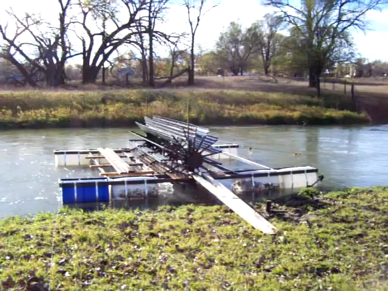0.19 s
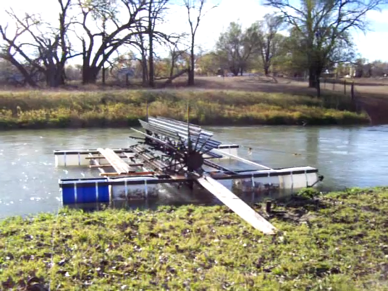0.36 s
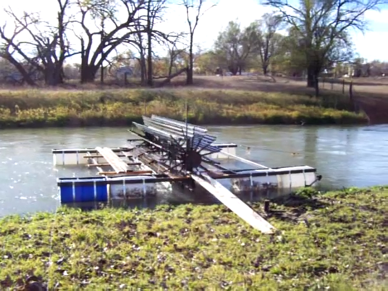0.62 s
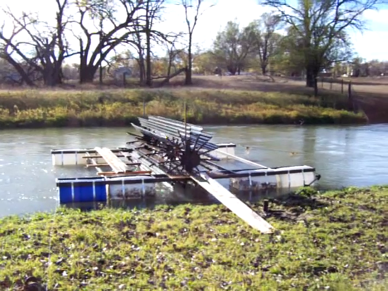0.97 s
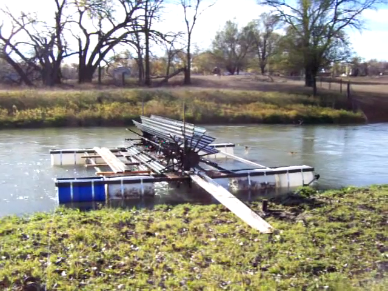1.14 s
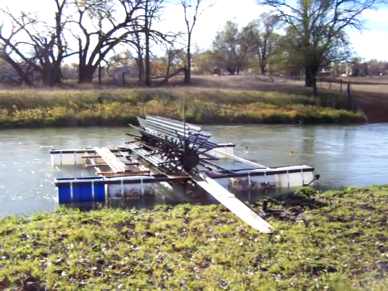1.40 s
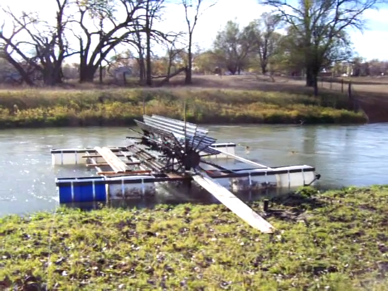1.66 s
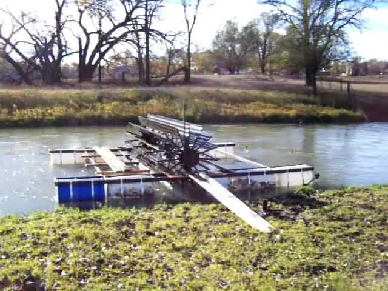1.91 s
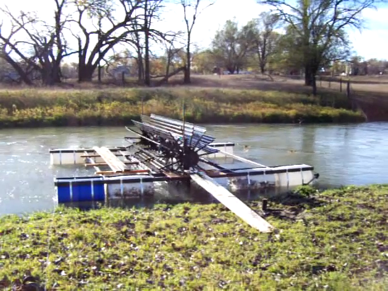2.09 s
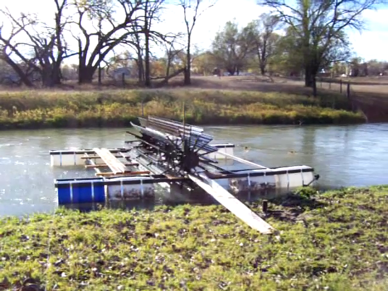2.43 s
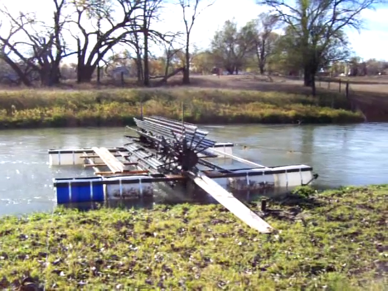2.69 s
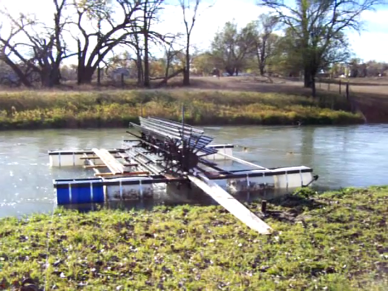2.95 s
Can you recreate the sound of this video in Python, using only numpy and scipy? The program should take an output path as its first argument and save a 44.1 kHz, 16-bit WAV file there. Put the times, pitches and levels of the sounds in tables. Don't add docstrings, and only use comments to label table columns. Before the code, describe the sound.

River water gurgles, drips and surges around a floating paddle wheel while wind softly buffets the microphone

```python
import sys
import numpy as np
from scipy import signal
from scipy.fft import rfft, irfft, next_fast_len
from scipy.io import wavfile
from scipy.ndimage import uniform_filter1d, map_coordinates

SR = 44100
rng = np.random.default_rng(int(sys.argv[2]) if len(sys.argv) > 2 else 0)


def invert_db(x):
    u = np.asarray(x, float) / 20
    return 10 ** u


def int16_out(signal):
    q = np.round(np.clip(np.atleast_2d(signal).T, -1, 1) * 32767)
    wavfile.write(sys.argv[1], SR, q.astype(np.int16))


N = 134946

# (time [s], level [dB])
POUR_LEVEL = [(0.0, -22.5), (0.05, -32.5), (0.08, -27.5), (0.46, -25), (0.5, -29), (0.59, -32),
              (0.6, -29.5), (0.85, -25), (1.1, -29), (1.16, -24), (1.35, -28.5), (1.35, -33.5),
              (1.41, -30.5), (1.58, -32), (1.92, -32.5), (2.07, -26), (2.35, -29), (3.06, -28.5)]
# (frequency [Hz], density [dB per Hz])
SPLASH_COLOUR = [(500, -11.5), (1000, -20.5), (1800, -4.5), (2600, -2.5), (3500, 2.5), (5900, -7.5),
                 (7500, -26), (10100, -45)]
# (frequency [Hz], density [dB per Hz])
CURRENT_COLOUR = [(120, -12), (250, -10), (500, 5.5), (1000, 1), (2000, -12.5), (4000, -4.5), (6000, -16),
                  (10000, -47.5)]
# (time [s], level [dB])
WIND_LEVEL = [(0, -38), (.2, -38), (.3, -32.5), (.38, -43), (.46, -36.5), (.75, -36.5), (1.13, -39),
              (1.35, -39.5), (1.52, -37.5), (1.7, -36.5), (2.04, -31.5), (2.14, -40.5), (2.45, -33),
              (2.56, -45.5), (2.79, -32.5), (2.86, -36.5), (2.98, -29.5), (3.06, -37)]
# (frequency [Hz], density [dB per Hz])
RUMBLE_COLOUR = [(12, -41), (20, -10.5), (54, -2.5), (107, -6), (189, -9), (300, -17), (390, -42),
                 (660, -120)]
# (centre [s], peak [dB], pitch [Hz])
GULPS = [(0.078, -33, 894), (.145, -32.5, 302), (.169, -29, 477), (.185, -34, 347), (0.196, -29, 1430),
         (0.204, -29, 1940), (0.216, -29, 565), (0.469, -27, 1310), (0.471, -30, 533), (0.687, -33.5, 364),
         (0.783, -31, 337), (.844, -35, 477), (.89, -33.5, 480), (.909, -33, 1450), (1.108, -27.5, 450),
         (1.156, -35, 480), (1.363, -36, 454), (1.56, -31.5, 970), (1.855, -33, 544), (1.975, -32.5, 425),
         (2.027, -28, 470), (2.05, -30, 418), (2.069, -33, 500), (2.189, -34, 1470), (2.787, -34.5, 500)]
# (start [s], end [s], level [dB])
SPRAYS = [
    (0.084, .475, -52),
    (.75, 1.017, -50.5),
    (1.156, 1.3, -41.5),
    (2.06, 2.15, -39.5),
    (2.176, 2.294, -39.5),
]
# (time [s], peak [dB], pitch [Hz], ring [s])
DROPS = [(.1157, -19, 4500, .004), (.128, -12, 3580, .002), (.271, -14, 3050, .004),
         (.4337, -11, 3100, .002), (.4350, -8.5, 3300, .003), (.4855, -19, 2900, .002),
         (.5330, -13.5, 4200, .003), (.5812, -7, 3800, .0017), (.8165, -20, 3700, .008),
         (.9405, -17, 3050, .004), (1.015, -21, 3200, .005), (1.1535, -18, 3600, .004),
         (1.2155, -17, 3300, .003), (1.2645, -17, 4300, .002), (1.281, -19, 2800, .003),
         (1.349, -18, 3900, .0015), (.459, -17, 4700, .004), (1.3592, -14, 3370, .003),
         (1.366, -16, 3650, .002), (1.478, -22, 5000, .003), (2.0143, -21, 5850, .005),
         (2.403, -24, 5000, .006), (2.967, -22, 3500, .006), (2.0143, -54, 10000, .005),
         (2.638, -17, 3500, .002), (2.8, -17, 3900, .002), (.394, -18, 3900, .004), (.576, -20, 3900, .002)]
# (time [s], peak [dB], pitch [Hz], ring [s])
SNAPS = [
    (1.3532, -9, 4700, .001),
    (1.3532, -36, 8000, .0005),
    (3.0104, -8, 5000, .0007),
    (3.0104, -30, 7800, .0005),
    (.4975, -38, 7000, .001),
    (.643, -38, 7000, .001),
    (.1283, -15, 4000, .0007),
    (.2675, -18, 4200, .001),
    (2.845, -37, 7200, .001),
]
# (time [s], peak [dB], pitch [Hz])
TICKS = [(0.1444, -16.5, 3540), (0.1548, -19, 3720), (0.2081, -23, 2940), (0.2428, -20, 3600),
         (0.2502, -22, 3400), (0.3584, -14, 2950), (0.3763, -17, 3860), (0.404, -20, 3650),
         (0.4541, -17, 4150), (0.5702, -14, 3800), (0.604, -17, 4070), (0.6917, -18, 3420),
         (0.7078, -29, 3280), (0.7745, -16, 4270), (0.8097, -19, 3450), (0.8317, -16, 3780),
         (0.8391, -22, 3600), (0.8598, -19, 3720), (0.9255, -19, 4000), (0.9344, -23.5, 3700),
         (0.9868, -20, 3440), (1.1446, -17, 3930), (1.1586, -20, 3580), (1.1632, -23, 3450),
         (1.17, -20, 3430), (1.2396, -24, 3320), (1.2468, -15, 3600), (1.3174, -19, 3700),
         (1.8004, -23, 2450), (2.0575, -35, 3300), (2.2081, -14, 3980), (2.2239, -23, 3550),
         (2.2736, -14.5, 3580), (2.6244, -18, 3170), (2.7643, -18, 2500), (2.7827, -28.5, 3380)]
# (time [s], level [dB], time to fall 20 dB [s], brightness [dB per octave])
SPLASHES = [(.19, -29, 0.33, -0.5), (0.372, -28.5, 0.087, -0.5), (0.438, -30, 0.026, 10.5),
            (0.451, -31.5, 0.025, 11.5), (0.496, -30, 0.0062, 15.5), (0.532, -25, 0.062, 1.5),
            (.566, -29.5, 0.12, -2.5), (0.643, -24.5, 0.056, 2.5), (0.692, -40, .012, 2),
            (0.812, -28.5, 0.19, 1), (1.144, -37, 0.026, 0), (1.217, -17, 0.014, -15.5),
            (1.355, -20, 0.03, 1.5), (1.565, -26.5, 0.14, -0.5), (1.629, -24.5, 0.032, 2.5),
            (1.795, -25, 0.055, 0), (1.928, -22, 0.013, 4), (2.048, -27.5, 0.15, 4), (2.2, -31, 0.077, 6.5),
            (2.344, -44, 0.02, -0.5), (2.6, -28, 0.31, -0.5), (2.75, -22.5, 0.046, 2),
            (2.888, -27.5, 0.069, 0), (3.013, -23.5, 0.061, -4)]
# (centre [s], peak [dB], pitch [Hz])
THUDS = [(.257, -22.5, 70.4), (0.295, -22, 79), (.335, -26, 59.3), (0.456, -26.5, 80), (.67, -27, 109),
         (.744, -26.5, 120), (.828, -26.5, 70), (1.251, -25, 80), (1.335, -24.5, 81), (1.372, -25, 70),
         (1.405, -22, 119), (1.442, -29, 100), (1.48, -28, 120), (1.565, -28, 140), (1.655, -26, 70),
         (1.719, -26, 190), (1.743, -23, 80.5), (1.775, -32, 90), (1.809, -25, 100), (1.826, -24.5, 99),
         (1.864, -30, 90), (1.911, -20, 102), (1.926, -21, 150), (1.943, -24, 81), (1.973, -26, 91),
         (2.029, -22, 110), (2.046, -26, 100), (2.08, -28, 60), (2.226, -25, 80), (2.258, -26, 70),
         (2.615, -29, 85), (2.637, -28, 80), (2.738, -24, 192), (2.761, -25.5, 190), (2.785, -27, 70),
         (2.803, -23, 111), (2.879, -22, 87), (2.905, -21.5, 208), (2.941, -23, 80), (2.974, -19, 112),
         (3.005, -19.5, 100), (3.05, -24, 100)]


def unit(x):
    return x / np.sqrt(np.mean(x ** 2) + 1e-20)


def along(points, hz):
    point_hz, db = np.transpose(points)
    return np.interp(np.log(hz + 1), np.log(point_hz + 1), db)


def curve(rows):
    return np.interp(np.arange(N) / SR, *np.transpose(rows))


def wobble(rate_hz):
    knot = np.arange(N) * np.clip(rate_hz, 0.1, 300) / SR
    return map_coordinates(rng.standard_normal(1000), [knot])


def filtered(x, response):
    m = next_fast_len(N + SR // 2)
    return irfft(rfft(x, m) * response(np.fft.rfftfreq(m, 1 / SR)), m)[..., :N]


def rush(colour, patchy_db):
    z = signal.stft(rng.standard_normal(N), nperseg=256)[2]
    field = uniform_filter1d(rng.standard_normal(z.shape), size=4, axis=0)
    field = uniform_filter1d(field, size=10, axis=1)
    x = signal.istft(z * invert_db(patchy_db * unit(field)), nperseg=256)[1][:N]
    return unit(filtered(x, lambda hz: invert_db(along(colour, hz))))


def placed(s, wave):
    size = wave.shape[1]
    at = np.round(s * SR).astype(int)[:, None] + np.arange(size)
    return np.bincount(at.ravel(), wave.ravel(), N + size + SR)


def bubbles(s, db, hz, ring_s, size):
    rise, soft = 0.08, 0.15
    t = np.arange(size) / SR
    u = t / np.maximum(ring_s, 1e-4)[:, None]
    tone = np.sin(2 * np.pi * hz[:, None] * t * (1 + rise * np.minimum(u, 2) / 2))
    wave = tone * invert_db(-20 * u) * (1 - np.exp(-u / soft)) ** 2
    wave = wave * (invert_db(db) / np.abs(wave).max(axis=1))[:, None]
    return placed(s, wave)[:N]


def swarm(count, centre_hz, spread, cycles, scatter_db, size):
    when, luck = rng.random((count, 2)).T
    pitch, life = rng.standard_normal((count, 2)).T
    hz = np.clip(centre_hz * np.exp(spread * pitch), 150, 11000)
    ring_s = np.minimum(cycles * np.exp(0.5 * life) / hz, size / SR / 2)
    db = -scatter_db * np.log(luck + 0.0078)
    return unit(bubbles(when * N / SR, db, hz, ring_s, size=size))


def cluster(rows, size):
    twin_db, spread, late = -10, 0.11, 0.4
    s, db, hz, ring_s = np.transpose(rows)
    luck = rng.random((len(s), 2))
    out = bubbles(s, db - 1.5, hz, ring_s, size=size)
    for k, side in enumerate((1, -1)):
        twin_s = s + late * ring_s * luck[:, k]
        twin_hz = hz * np.exp(side * spread * (0.5 + luck[:, 1 - k]))
        out = out + bubbles(twin_s, db + twin_db, twin_hz, ring_s, size=size)
    return out


def swells(s, db, hz, length_s, rise, size):
    t = (np.arange(size) - size // 2) / SR
    u = t / np.maximum(length_s, 1e-3)[:, None]
    phase = 2 * np.pi * (hz[:, None] * t * (1 + rise * u / 2) + rng.random((len(s), 1)))
    wave = invert_db(db)[:, None] * np.sin(phase) * np.cos(np.pi * np.clip(u, -0.5, 0.5)) ** 2
    return placed(s, wave)[size // 2:][:N]


def pouring():
    fizz_db, sheet_db, crackle_db, patter_db = -6, -4, -21, -19

    def tinted(x):
        return unit(filtered(x, lambda hz: invert_db(0.64 * along(SPLASH_COLOUR, hz))))

    surge_db = curve(POUR_LEVEL) + 1.14 * wobble(24.71) + 0.45 * wobble(50)
    fizz = tinted(swarm(count=9000, centre_hz=3297, spread=0.721, cycles=7, scatter_db=2.0, size=330))
    crackle = tinted(swarm(count=1500, centre_hz=7350, spread=0.16, cycles=1.4, scatter_db=0.0, size=64))
    patter = tinted(swarm(count=260, centre_hz=4120, spread=0.358, cycles=4.7, scatter_db=2.5, size=330))
    sheet = rush(SPLASH_COLOUR, patchy_db=3.0)
    mix = invert_db(patter_db) * patter + invert_db(fizz_db) * fizz
    mix = mix + invert_db(sheet_db) * sheet + invert_db(crackle_db) * crackle
    return invert_db(surge_db) * mix


def current():
    current_db, gurgle_db, follow = -33.5, -43, 0.28
    pour_db = curve(POUR_LEVEL)
    swing_db = follow * (pour_db - pour_db.mean()) + 0.5 * wobble(15)
    gurgle = swarm(count=1200, centre_hz=833, spread=0.652, cycles=9, scatter_db=2.2, size=2200)
    flow = rush(CURRENT_COLOUR, patchy_db=0.5)
    return invert_db(swing_db) * (invert_db(current_db) * flow + invert_db(gurgle_db) * gurgle)


def wind():
    steady_s = 0.17
    lumps = invert_db(wobble(29.98)) * rush(RUMBLE_COLOUR, patchy_db=2.8)
    span = round(steady_s * SR)
    swell = uniform_filter1d(uniform_filter1d(lumps ** 2, size=span), size=span)
    return invert_db(curve(WIND_LEVEL)) * lumps / np.sqrt(np.abs(swell) + 0.035)


def gulps():
    rough_db = 2.5
    s, db, hz = np.transpose(GULPS)
    length_s = 0.033 * (500 / hz) ** 0.27
    return swells(s, db, hz, length_s, rise=0.15, size=4096) * invert_db(rough_db * wobble(140))


def spray():
    centre_hz, edge_s = 5640, 0.015
    t = np.arange(N) / SR
    gate = np.zeros(N)
    for start_s, end_s, db in SPRAYS:
        gate += invert_db(db) * np.clip(np.minimum(t - start_s, end_s - t) / edge_s, 0, 1)
    mist = swarm(count=6000, centre_hz=centre_hz, spread=0.34, cycles=4.8, scatter_db=1.5, size=200)
    return gate * filtered(mist, lambda hz: invert_db(-25 * np.log2(np.maximum(hz, centre_hz) / centre_hz)))


def drops():
    echo_s, echo_db = 0.0032, -11
    plink = cluster(DROPS, size=1200) + bubbles(*np.transpose(SNAPS), size=300)
    return plink + invert_db(echo_db) * np.pad(plink, (round(echo_s * SR), 0))[:N]


def ticks():
    cycles, level_db = 9, -2.5
    s, db, hz = np.transpose(TICKS)
    return cluster(np.transpose([s, db + level_db, hz, cycles / hz]), size=600)


def splashes():
    rise_s, size = 0.0035, 8192
    out = np.zeros(N + SR)
    t, hz = np.arange(size) / SR, np.fft.rfftfreq(size, 1 / SR)
    octaves = np.log2(np.maximum(hz, 1000) / 3600)
    for s, db, fade_s, bright_db in SPLASHES:
        colour = (hz > 400) * invert_db(along(SPLASH_COLOUR, hz) + bright_db * octaves)
        burst = unit(irfft(rfft(rng.standard_normal(size)) * colour))
        envelope = invert_db(db - 20 * t / fade_s) * (1 - np.exp(-t / rise_s))
        out[round(s * SR):][:size] += burst * envelope
    return out[:N] * invert_db(1.7 * wobble(250))


def thuds():
    cycles, level_db = 2.03, -1.5
    s, db, hz = np.transpose(THUDS)
    return swells(s, db + level_db, hz, cycles / hz, rise=0.05, size=4096)


def ground(x):
    hollow_hz, share, dull_hz = 696, 0.65, 1310

    def bounce(hz):
        return 1 + share * np.exp(-1j * np.pi * hz / hollow_hz) / (1 + (hz / dull_hz) ** 4)

    return filtered(x, bounce)


def scene():
    water = ground(pouring() + current() + spray() + splashes())
    return (water + wind() + gulps() + drops() + ticks() + thuds())[None]


def band_limit(x):
    return signal.sosfilt(signal.butter(12, 10280, fs=SR, output="sos"), x)


def record(dry):
    case_hz, case_share, low_cut_hz, top_hz = 1944, 0.024, 7.9, 9980

    def microphone(hz):
        echo = case_share * np.exp(-2j * np.pi * hz / case_hz) * hz ** 2 / (hz ** 2 + case_hz ** 2)
        low_cut = hz ** 2 / (hz ** 2 + low_cut_hz ** 2)
        return (1 + echo) * low_cut / (1 + (hz / top_hz) ** 60)

    return band_limit(filtered(dry, microphone))


dry = scene()
out = record(dry)
int16_out(out)
```